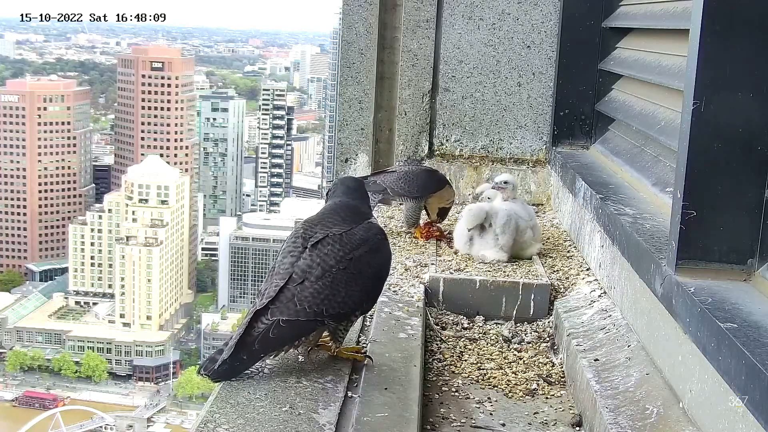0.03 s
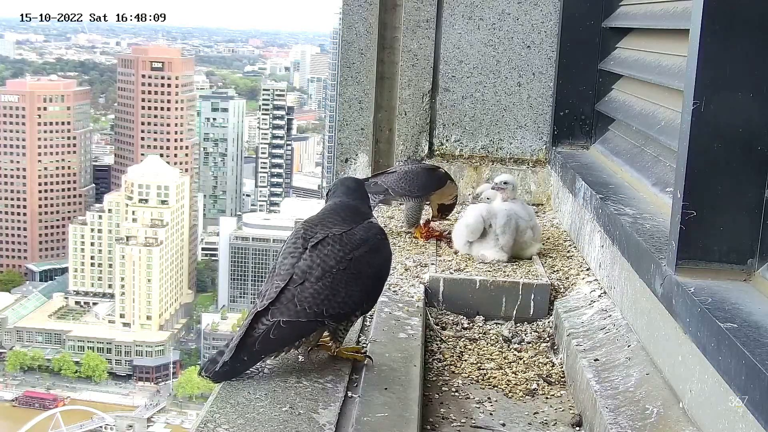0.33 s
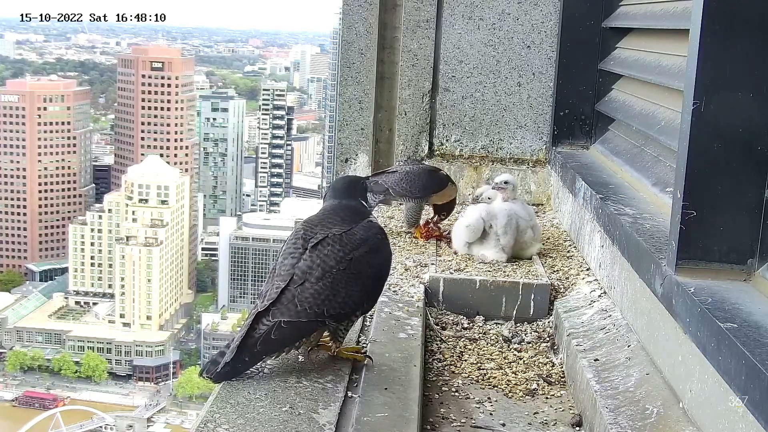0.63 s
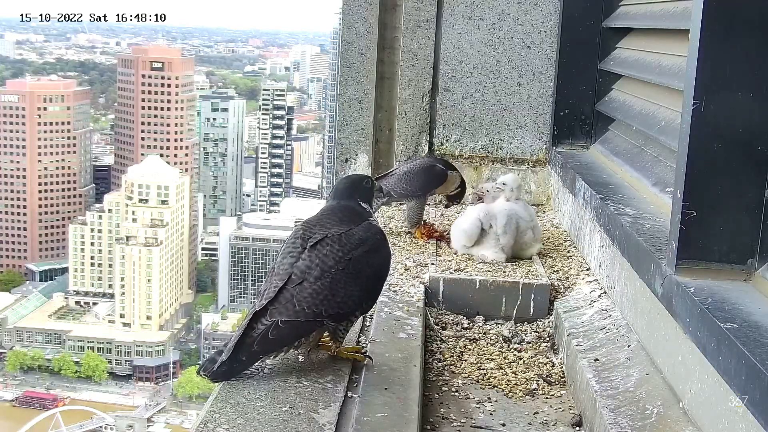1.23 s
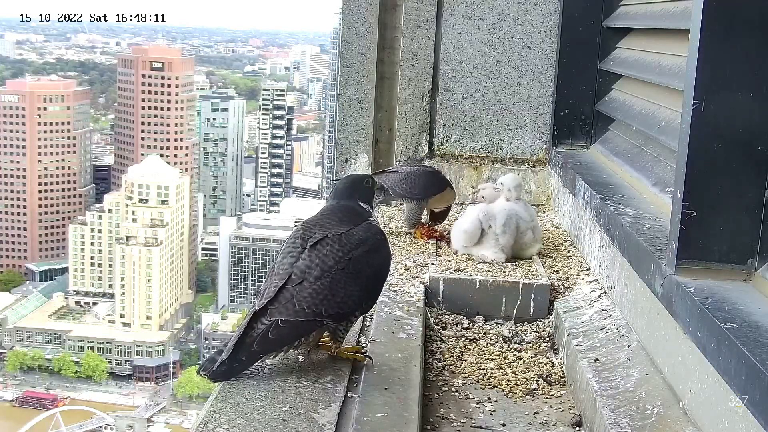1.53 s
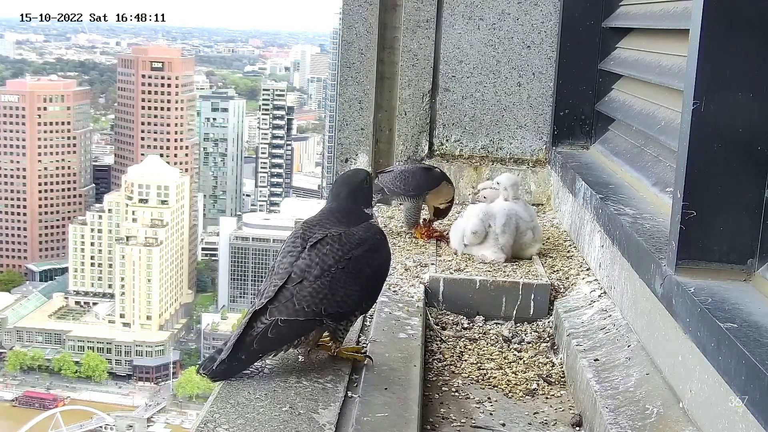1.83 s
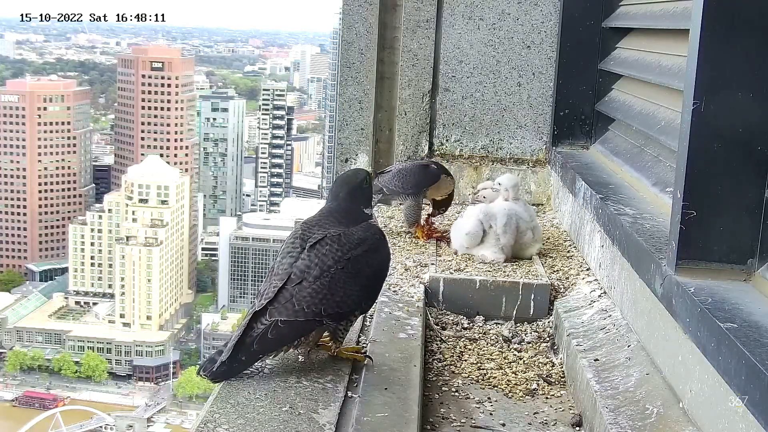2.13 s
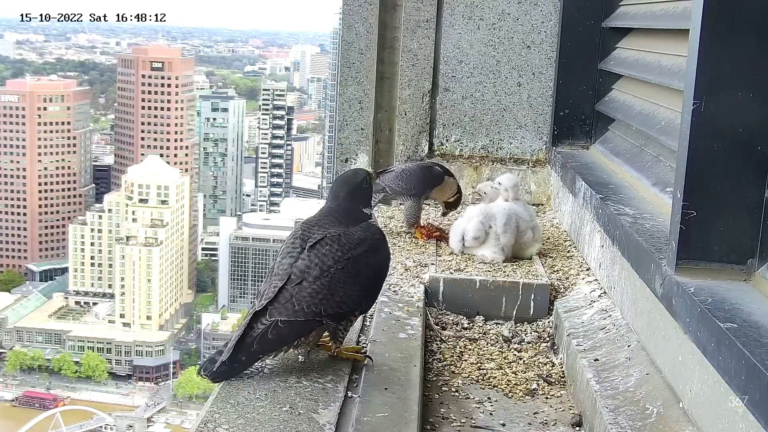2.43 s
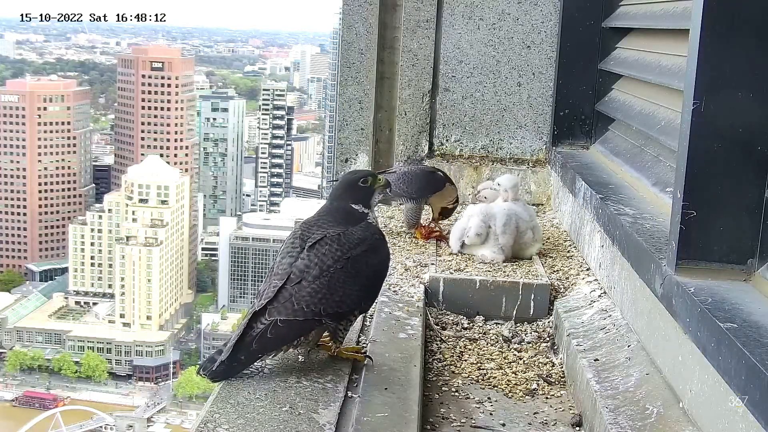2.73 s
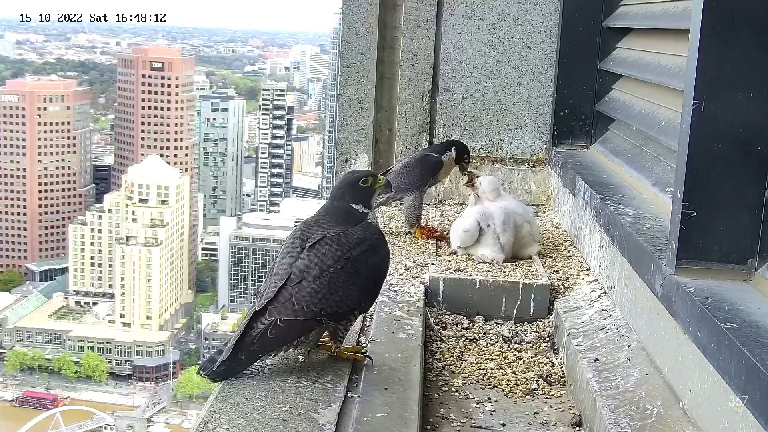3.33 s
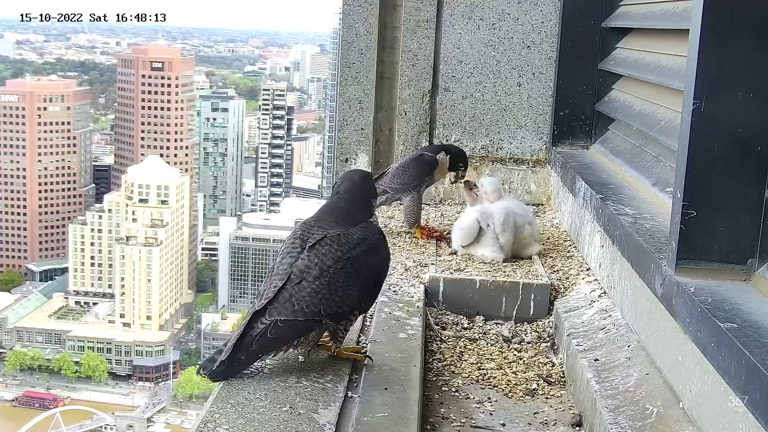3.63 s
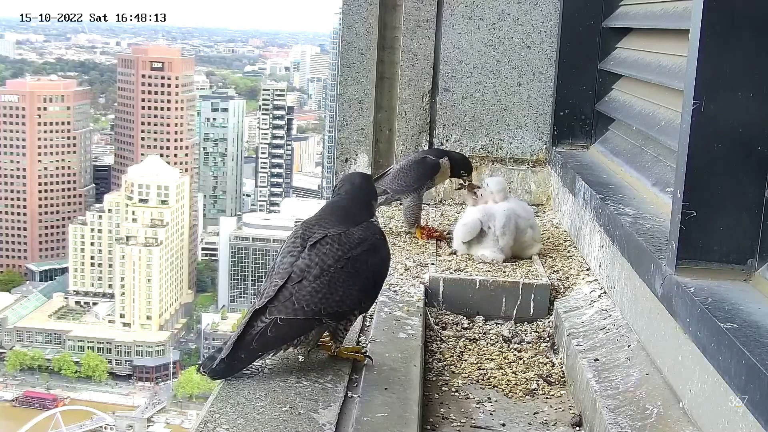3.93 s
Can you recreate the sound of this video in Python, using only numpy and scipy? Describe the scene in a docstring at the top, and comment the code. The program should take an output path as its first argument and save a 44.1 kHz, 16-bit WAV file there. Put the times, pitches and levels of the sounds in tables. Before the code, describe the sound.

A falcon gives one harsh scream, then chicks whine faintly in gusting wind.

```python
"""A falcon's ledge high on a concrete tower, with a small camera microphone close to the birds.
The adult opens with a thin whistle from one side of its syrinx, then gives one harsh scream from the
other, overloading the microphone. The walls ring briefly and the towers around send back a faint echo.
The chicks beg with faint wavering whines; food is plucked once, and squeaks and hoarse wails join in.
Gusts buffet the ledge throughout, over the wash of the city far off."""
import sys
import numpy as np
from scipy import signal
from scipy.fft import rfft, irfft
from scipy.io import wavfile

SR = 44100
rng = np.random.default_rng(int(sys.argv[2]) if len(sys.argv) > 2 else 0)


def materialize(psi):
    """Save the field psi as 16-bit PCM at rate SR to the path in sys.argv[1].

    A 1-D psi becomes a single channel; in a 2-D psi each row is a channel.
    """
    bounded = np.clip(np.atleast_2d(psi).T, -1, 1)
    quanta = np.round(bounded * 32767).astype(np.int16)
    wavfile.write(sys.argv[1], SR, quanta)


N = 176400
T = np.arange(N) / SR

# Wind on the ledge. Each row: time in seconds, low buffeting and the rush above it in relative dB.
GUST_LEVELS = [(0.0, -55.5, -58), (0.32, -68, -75), (0.37, -55.5, -99), (0.4, -61, -90.5),
               (0.48, -57.5, -53.5), (0.5, -57, -64.5), (0.64, -57.5, -63.5), (0.7, -56, -60),
               (0.87, -54, -58), (0.91, -51, -60.5), (1.05, -58, -59.5), (1.14, -52.5, -54.5),
               (1.35, -57.5, -53.5), (1.4, -60.5, -61), (1.5, -50, -59), (1.6, -60, -59.5),
               (1.74, -55, -62), (1.79, -53.5, -59), (1.9, -52.5, -53.5), (1.94, -55, -64),
               (2.02, -66, -54.5), (2.04, -56, -56), (2.13, -59, -65.5), (2.16, -54.5, -55),
               (2.29, -55.5, -63.5), (2.32, -62.5, -62.5), (2.51, -57.5, -57), (2.54, -68, -67),
               (2.63, -65.5, -59), (2.71, -56, -56), (2.81, -67, -67.5), (2.91, -53, -53.5),
               (3.11, -67, -60.5), (3.24, -57, -54.5), (3.3, -61, -61), (3.39, -63, -55),
               (3.48, -51.5, -55.5), (3.61, -56, -60), (3.65, -60.5, -51.5), (3.7, -58.5, -61.5),
               (3.77, -60.5, -56.5), (3.79, -52.5, -55), (3.97, -58.5, -57.5), (4.0, -54, -58)]


def undb(db):
    """Decibels to gain."""
    return 10 ** (np.asarray(db) / 20)


def curve(rows):
    """Each column after the first, joined by straight lines in time."""
    rows = np.array(rows, float)
    return [np.interp(T, rows[:, 0], col) for col in rows.T[1:]]


def gate(rows, fade_s=.008):
    """Open from a call's first row to its last."""
    return np.clip((T - rows[0][0]) / fade_s + 1, 0, 1) * np.clip((rows[-1][0] - T) / fade_s + 1, 0, 1)


def shaped(gain):
    """Unit noise with the given gain at each frequency."""
    hz = np.arange(N // 2 + 1) * SR / N + 1e-3
    x = irfft(rfft(rng.standard_normal(N)) * gain(hz), N)
    return x / x.std()


def noise(points):
    """Unit noise coloured by (Hz, dB) points."""
    hz, db = np.array(points, float).T
    return shaped(lambda f: undb(np.interp(np.log(f), np.log(hz), db)))


def wobble(rate_hz):
    """Unit random wobble, mostly slower than the given rate."""
    return shaped(lambda f: 1 / (1 + (f / rate_hz) ** 2))


def syrinx_phase(hz, jitter, rate_hz):
    """Phase of a syrinx whose pitch trembles."""
    return 2 * np.pi * np.cumsum(hz * (1 + jitter * wobble(rate_hz))) / SR


def husky(phase, husk, width_hz):
    """A partial of unit power, part of which is smeared into a noisy skirt."""
    smear = husk * (wobble(width_hz) * np.sin(phase) + wobble(width_hz) * np.cos(phase))
    return (np.sqrt(2) * np.sin(phase) + smear) / np.sqrt(1 + husk ** 2)


def reflections(x, t60_s, delay_s, band_hz):
    """Diffuse reflections that start after a delay and die away."""
    age = T - delay_s
    response = rng.standard_normal(N) * (age > 0) * undb(-60 * np.maximum(age, 0) / t60_s)
    wet = signal.fftconvolve(x, response / np.linalg.norm(response))[:N]
    return signal.sosfilt(signal.butter(8, band_hz, "band", fs=SR, output="sos"), wet)


def background():
    """The background: the distant city's wash, swelling a little with the gusts, and apart from it a faint
    steady tone at 6 kHz."""
    # Colour of city and air. Each row: frequency in Hz, relative level in dB.
    colour = [(60, -16), (300, -18), (900, 1), (1300, -1), (1900, -6.5), (2700, -6.5), (3400, -13),
              (4050, -11.5), (4400, -24.5), (5500, -30), (6100, -31.5), (6500, -35), (9000, -38),
              (15000, -40)]
    _, rush_db = curve(GUST_LEVELS)
    wash = noise(colour) * undb(-67.5 + 1.18 * wobble(29) + .29 * (rush_db - rush_db.mean()))
    return wash + undb(-98.5) * np.sin(2 * np.pi * 6000 * T)


def wind():
    """Gusts stir the hollow of the ledge: a low buffeting and a flickering rush above it."""
    # Colours of the two bands. Each row: frequency in Hz, relative level in dB.
    buffet_colour = [(30, -29), (55, -17), (75, -18.5), (100, -15), (128, -11.5), (146, -5), (170, -9),
                     (205, -7.5), (238, 2), (262, 0), (300, 0.5), (350, -6.5), (450, -40), (900, -73)]
    rush_colour = [(60, -69), (200, -35.5), (330, -4.5), (395, 7.5), (470, 2), (640, 0.5), (800, -5),
                   (1000, -18), (1600, -41), (3000, -74)]
    buffet_db, rush_db = curve(GUST_LEVELS)
    buffet = noise(buffet_colour) * undb(buffet_db + 2.16 * wobble(8.7) - 1.18)
    rush = noise(rush_colour) * undb(rush_db + 1.8 * wobble(46) - 3)
    return buffet + rush


def puffs():
    """Dull bursts of turbulence thump on the ledge, each swelling fast and dying away."""
    # Each row: start in seconds, level in dB, centre frequency in Hz.
    bursts = [(0.644, -50.5, 249.2), (0.674, -59, 405), (1.488, -54, 615), (1.712, -55, 480),
              (1.764, -44.5, 290), (2.15, -55.5, 280), (2.685, -57, 323), (2.819, -58, 526),
              (3.683, -50, 287)]
    rise_s, width_octaves = .0081, .46
    out = np.zeros(N)
    for start, db, hz in bursts:
        age = np.maximum(T - start, 0) / rise_s
        turbulence = shaped(lambda f: np.exp(-(np.log2(f / hz) / width_octaves) ** 2 / 2))
        out += undb(db) * age * np.exp(1 - age) * turbulence
    return out


def ledge_ring(adult, young):
    """The concrete walls close around the birds ring briefly."""
    adult_ring = reflections(adult, t60_s=.2, delay_s=.015, band_hz=(860, 5820))
    young_ring = reflections(young, t60_s=.36, delay_s=.0018, band_hz=(970, 7500))
    return undb(-9.5) * adult_ring + undb(-7.5) * young_ring


def tower_echoes(adult):
    """One tower's face returns the strongest partial; returns from further off blur in moving air."""
    blurred = adult * (1 + wobble(360))
    face = reflections(adult, t60_s=.4, delay_s=.41, band_hz=(2340, 2560))
    streets = reflections(blurred, t60_s=2.9, delay_s=.11, band_hz=(1100, 3440))
    return undb(-28.5) * face + undb(-27) * streets


def pluck():
    """A brief dry rustle as the food is plucked."""
    start_s, rise_s, decay_s = 2.466, .0009, .018
    age = np.maximum(T - start_s, 0)
    rustle = noise([(2000, -28), (4500, 20), (5800, 24), (7500, 18), (13000, 1)])
    return undb(-75) * rustle * (1 - np.exp(-age / rise_s)) * np.exp(-age / decay_s)


def chick_squeaks():
    """Faint thin squeaks, each one husky partial that swells and fades."""
    # Each row: middle in seconds, length in seconds, pitch in Hz, level in dB.
    squeaks = [(2.745, .08, 4130, -80), (2.87, .09, 4200, -83), (2.95, .08, 4650, -85),
               (3.16, 0.07, 4850, -83), (3.405, 0.056, 4840, -76)]
    out = np.zeros(N)
    for middle, length, hz, db in squeaks:
        swell = np.exp(-(2 * (T - middle) / length) ** 2)
        phase = syrinx_phase(hz, jitter=.0046, rate_hz=84)
        out += undb(db) * swell * husky(phase, .53, 230)
    return out


def chick_wails():
    """Hoarse wails: two trembling partials, each about half noise."""
    # One list a wail. Each row: time in seconds, pitch in Hz, first and second partials in dB.
    wails = [
        [(3.14, 2850, -68.5, -102), (3.185, 2783, -65, -77), (3.212, 2725, -64, -82), (3.243, 2427, -60, -92),
         (3.305, 2454, -61, -98), (3.33, 2560, -67, -104)],
        [(3.38, 2860, -68, -84), (3.43, 2806, -65, -79), (3.475, 2703, -58.5, -81), (3.515, 2600, -64.5, -85),
         (3.565, 2750, -63, -96), (3.602, 2464, -58.5, -98), (3.625, 2430, -71, -113)],
        [(3.725, 2544, -72, -107), (3.748, 2520, -59, -101), (3.775, 2370, -86, -102)],
    ]
    out = np.zeros(N)
    for call in wails:
        hz, first_db, second_db = curve(call)
        phase = syrinx_phase(hz, jitter=.014, rate_hz=144)
        first = undb(first_db) * husky(phase, undb(-.5), 290)
        second = undb(second_db) * husky(2 * phase, 1, 300)
        out += gate(call) * (first + second)
    return out


def chick_whines():
    """Thin gliding whines that turn husky as the pitch sags and crack into a rasp when it drops fast."""
    # One list a whine. Each row: time in seconds, pitch in Hz, second and third partials in relative dB.
    whines = [
        [(.55, 2048, -78, -95), (.655, 2020, -76, -97), (.68, 1802, -61, -87), (.7, 1660, -64, -81),
         (.73, 1730, -66, -77), (.75, 1836, -61, -77), (.788, 1825, -61, -77), (.82, 2030, -63, -95),
         (.895, 2095, -68.5, -115), (.932, 1935, -62.5, -110), (1.0, 1854, -57, -92), (1.06, 1825, -55, -81),
         (1.09, 1842, -53.5, -72), (1.14, 1798, -57, -72), (1.168, 1660, -65, -72), (1.198, 1650, -66, -69),
         (1.215, 1708, -59, -76), (1.255, 1720, -59, -84), (1.29, 1810, -72, -100), (1.308, 1490, -65, -80),
         (1.335, 1380, -84, -79)],
        [(1.46, 2010, -90, -100), (1.505, 2000, -72, -100), (1.54, 2024, -88, -100)],
        [(1.85, 1955, -77, -99), (1.875, 1940, -64.5, -98), (1.948, 1925, -60.5, -97), (2.03, 1978, -63, -104),
         (2.13, 2003, -71, -101), (2.19, 1930, -61.5, -95), (2.228, 1837, -58.5, -88), (2.248, 1705, -65, -86),
         (2.285, 1720, -83, -88)],
        [(2.603, 1560, -82, -90), (2.611, 1590, -60, -86), (2.627, 1625, -78, -75), (2.645, 1662, -60, -70),
         (2.668, 1700, -60, -77), (2.688, 1870, -68, -96), (2.705, 2030, -80, -99)],
        [(3.705, 1715, -76, -102), (3.745, 1715, -67, -102), (3.772, 1712, -71, -111)],
        [(3.855, 1715, -80, -104), (3.875, 1810, -66, -101), (3.9, 2000, -71, -125)],
    ]
    # Colour of the crack. Each row: frequency in Hz, relative level in dB.
    crack_colour = [(2000, -25), (3300, -2), (4300, 0), (5100, -4), (6500, -22), (9000, -45)]
    husky_below_hz, crack_below_hz, range_hz, full_crack_hz_per_s = 1760, 1950, 200, 5000
    calling = sum(map(gate, whines))
    contours = sum(gate(call) * np.array(curve(call)) for call in whines)
    hz, second_db, third_db = contours / np.maximum(calling, 1e-9)
    phase = syrinx_phase(hz, jitter=.007, rate_hz=89.6)
    husk = undb(-11) + .6 * np.clip((husky_below_hz - hz) / range_hz, 0, 1)
    second = husky(2 * phase, husk, 330)
    first = undb(-17) * husky(phase, .61, 140)
    fourth = undb(-47) * husky(4 * phase, husk, 300)
    third = husky(3 * phase, husk + .35, 260)
    voice = undb(second_db) * (first + second + fourth) + undb(third_db) * third
    falling = np.clip(-np.gradient(hz) * SR / full_crack_hz_per_s, 0, 1)
    low = np.clip((crack_below_hz - hz) / range_hz, 0, 1)
    voice += falling * low * undb(second_db - 3) * noise(crack_colour)
    return calling * undb(-2.5 + 2.6 * wobble(35)) * voice


def opening_whistle():
    """A thin, nearly pure note from the other side of the syrinx opens the scream and fades under it."""
    # Each row: time in seconds, pitch in Hz, level in dB.
    note = [(0, 3465, -55.5), (.012, 3408, -43.5), (.033, 3402, -35), (.046, 3405, -46.5),
            (.058, 3480, -42), (.085, 3483, -44), (.112, 3490, -58.5), (.145, 3400, -65.5),
            (.16, 3530, -78.5)]
    # Each row: multiple of the pitch, level in dB against the fundamental.
    overtones = [(2, -23), (3, -35)]
    hz, level_db = curve(note)
    phase = syrinx_phase(hz, jitter=.004, rate_hz=300)
    tone = np.sin(phase) + sum(undb(db) * np.sin(k * phase) for k, db in overtones)
    return np.sqrt(2) * tone * undb(level_db + wobble(150)) * gate(note)


def scream():
    """The adult's pressed tone, its energy jumping between partials, with rasp and a period-four growl."""
    # Each row: time in seconds, pitch in Hz.
    pitch = [(.06, 1110), (.076, 1105), (.086, 1214), (.105, 1237), (.122, 1226), (.14, 1247), (.2, 1230),
             (.228, 1254), (.24, 1206), (.28, 1214), (.305, 1235), (.34, 1237), (.39, 1229), (.412, 1218),
             (.425, 1178), (.44, 1078)]
    # The strong partials. Each row: time in seconds, then the first, second and third in relative dB.
    strong_levels = [(.06, -71, -69, -57), (.078, -64, -46, -62), (.09, -44, -42, -57.5),
                     (.108, -42, -43.5, -57), (.125, -46.5, -44, -67.5), (.148, -42, -39.5, -60),
                     (.2, -43.5, -38.5, -52), (.213, -46, -38.5, -53), (.224, -49, -27, -68.5),
                     (.233, -42.5, -34, -39), (.243, -63, -33, -49), (.257, -41.5, -31.5, -47),
                     (.29, -43, -36.5, -39.5), (.298, -42.5, -38.5, -43.5), (.312, -60.5, -40, -47),
                     (.347, -41.5, -30, -40), (.36, -47, -44.5, -37.5), (.385, -46.5, -37.5, -38),
                     (.406, -37.5, -37.5, -34.5), (.414, -49, -34, -49), (.425, -87, -26, -52),
                     (.431, -62, -53, -44), (.437, -47.5, -45, -44.5), (.452, -75, -66, -71),
                     (.47, -88, -80, -84)]
    # Each row: time in seconds, then upper partials, rasp and growl in relative dB.
    harshness = [(0, -85, -68, -111), (.022, -83, -62, -103), (.036, -80, -50.5, -95),
                 (.05, -83, -66, -101), (.078, -56, -62, -81), (.095, -62, -49, -86),
                 (.125, -57.5, -63.5, -81), (.17, -55, -49.5, -78), (.21, -61.5, -53.5, -73),
                 (.226, -52.5, -48.5, -74), (.26, -42, -53.5, -82), (.285, -43, -50, -85),
                 (.305, -55.5, -41, -39.5), (.345, -41.5, -56, -45), (.37, -49, -60, -43.5),
                 (.422, -42, -46, -59), (.432, -51.5, -42.5, -59), (.455, -82, -66.5, -60),
                 (.475, -90, -85, -100)]
    # Partials 4 to 12, each a relative level in dB.
    upper_levels = [6.5, 6.5, 2, -5, -28, -15.5, -13, -27, -21]
    # The ringing third partial's own overtones. Each row: multiple of the pitch, dB against the third.
    ring_overtones = [(6, -27), (9, -38)]
    # The growl's sidebands. Each row: multiple of the pitch, relative level in dB.
    sidebands = [(1.25, -15), (1.75, -15), (2.25, 0), (2.5, -10), (2.75, -11), (3.25, -16), (4.25, -14),
                 (6.25, -14)]
    # Colour of the rasp. Each row: frequency in Hz, relative level in dB.
    rasp_colour = [(600, -63), (1200, -1), (1800, -3), (2600, 6), (4000, 1.5), (6000, -5), (8000, -12.5),
                   (10000, -15), (13500, -21)]
    phase = syrinx_phase(curve(pitch)[0], jitter=.0026, rate_hz=430)
    upper_gain, rasp_gain, growl_gain = undb(curve(harshness))
    strong_gains = undb(curve(strong_levels))
    strong = sum(gain * np.sin(k * phase) for k, gain in enumerate(strong_gains, 1))
    ring = strong_gains[-1] * sum(undb(db) * np.cos(k * phase) for k, db in ring_overtones)
    # The upper partials flicker, and the higher ones smear further into noise.
    upper = sum(undb(db + 3.5 * wobble(22)) * husky(k * phase, .14 * (k - 3), 260)
                for k, db in enumerate(upper_levels, 4))
    growl = sum(undb(db + 2 * wobble(40)) * np.sin(k * phase) for k, db in sidebands)
    rasp = noise(rasp_colour) * (1 + .097 * np.sin(phase))
    voice = np.sqrt(2) * (strong + ring)
    voice += upper_gain * upper / upper.std() + growl_gain * growl / growl.std() + rasp_gain * rasp
    shimmer = undb(-.5 + 1.07 * wobble(190))
    return voice * shimmer * gate(harshness)


def scene():
    """The birds in their concrete corner, with the towers' echoes, the wind and the city, in mono."""
    adult = opening_whistle() + scream()
    young = chick_whines() + chick_wails() + chick_squeaks() + pluck()
    echoes = ledge_ring(adult, young) + tower_echoes(adult)
    return (adult + young + echoes + wind() + background() + puffs())[None]


def record(dry):
    """The camera microphone overloads on the scream, thins the bass and cuts the top."""
    ceiling, low_cut_hz, top_hz = .034, 98, 13800
    flattened = dry / (1 + (dry / ceiling) ** 8) ** (1 / 8)
    thinned = signal.sosfilt(signal.butter(4, low_cut_hz, "high", fs=SR, output="sos"), flattened)
    return signal.sosfilt(signal.ellip(10, .2, 70, top_hz, fs=SR, output="sos"), thinned)


dry = scene()
out = record(dry)
materialize(out)
```